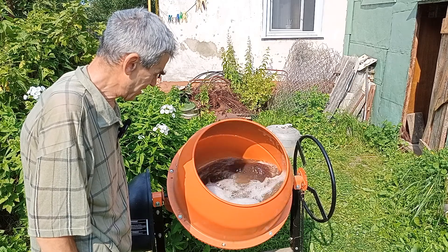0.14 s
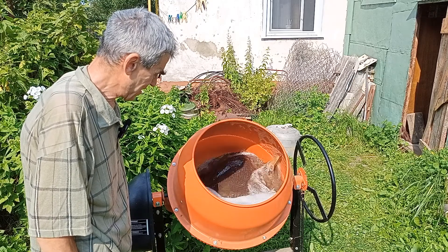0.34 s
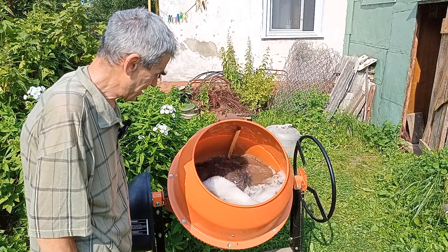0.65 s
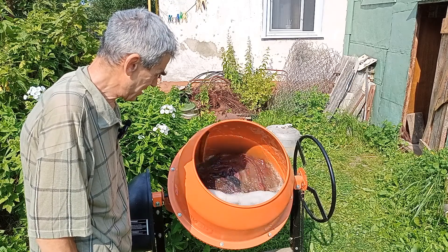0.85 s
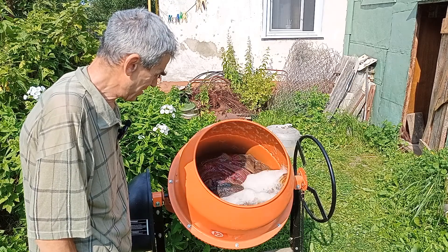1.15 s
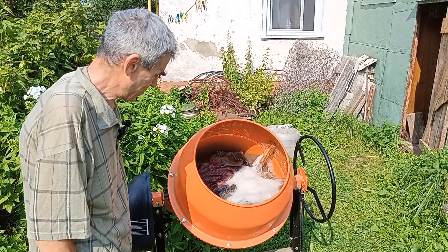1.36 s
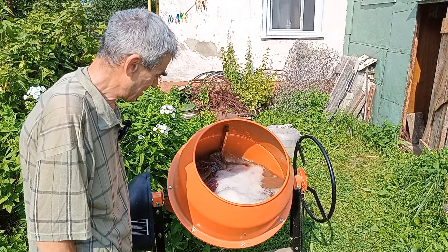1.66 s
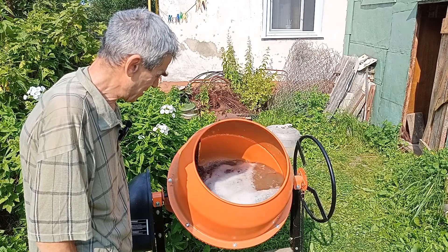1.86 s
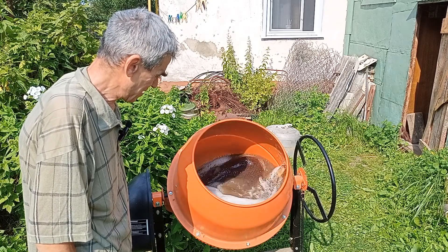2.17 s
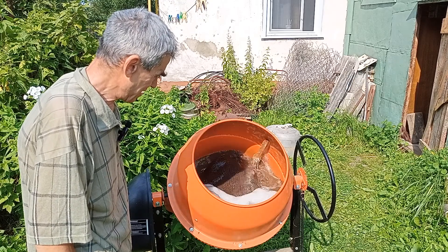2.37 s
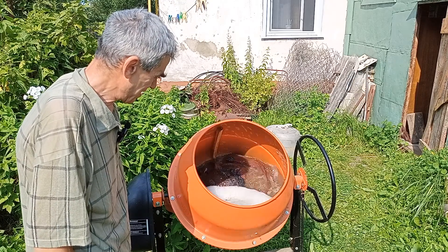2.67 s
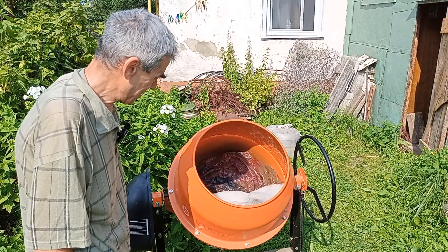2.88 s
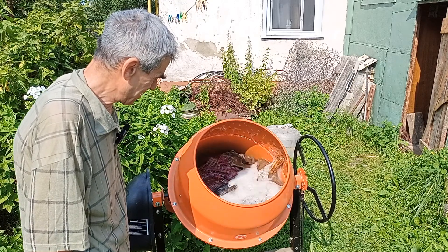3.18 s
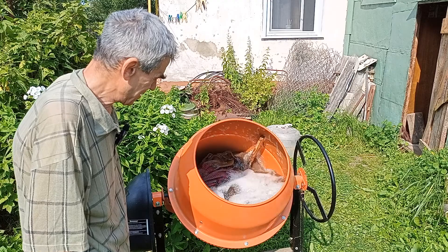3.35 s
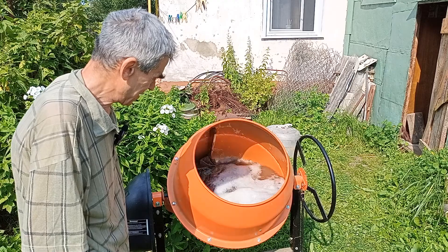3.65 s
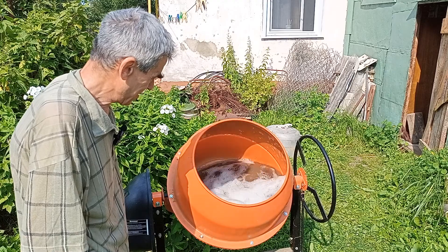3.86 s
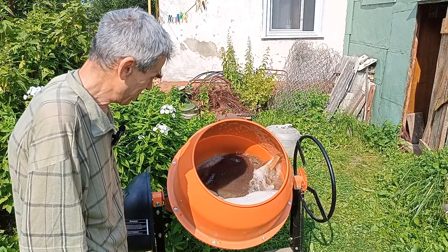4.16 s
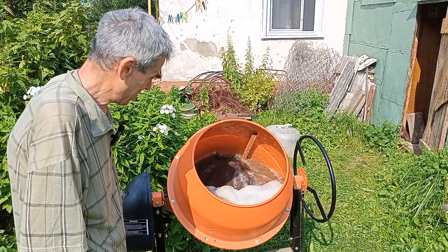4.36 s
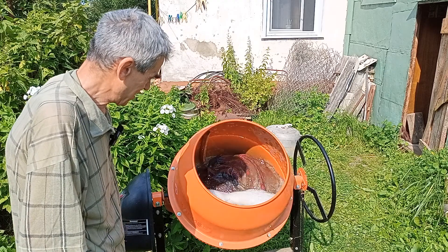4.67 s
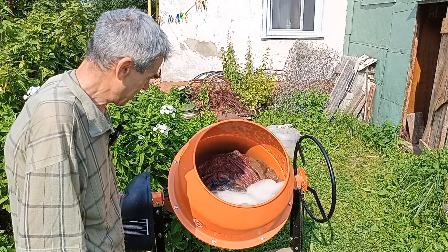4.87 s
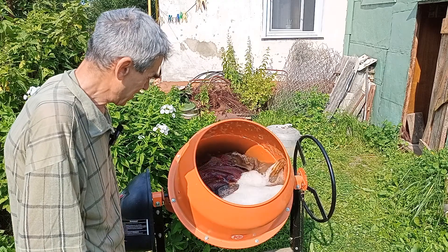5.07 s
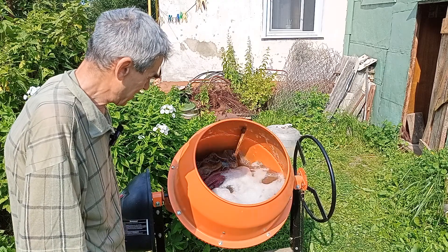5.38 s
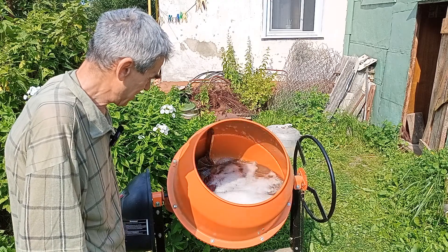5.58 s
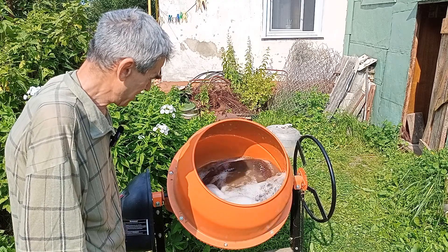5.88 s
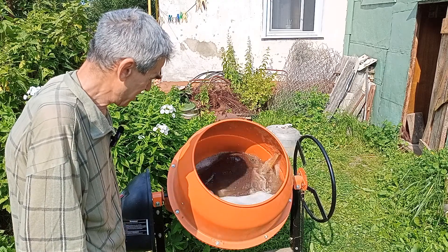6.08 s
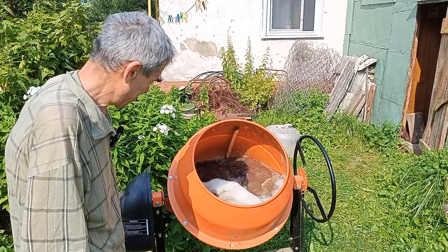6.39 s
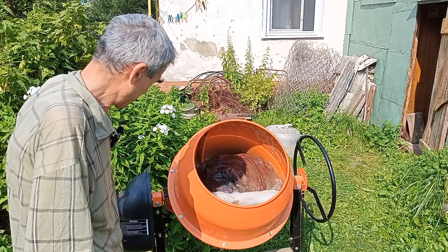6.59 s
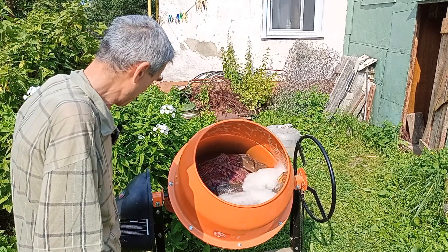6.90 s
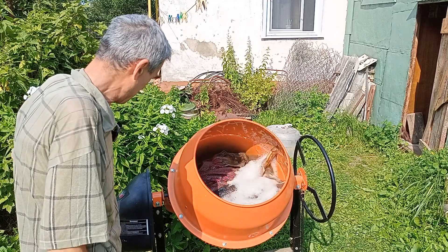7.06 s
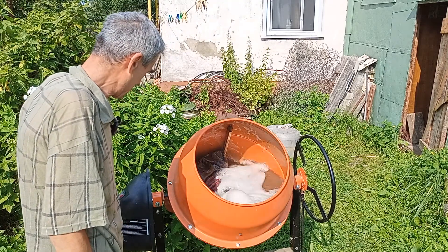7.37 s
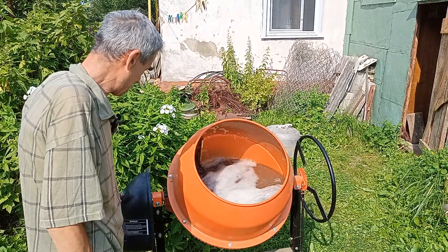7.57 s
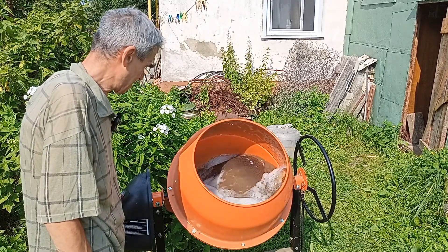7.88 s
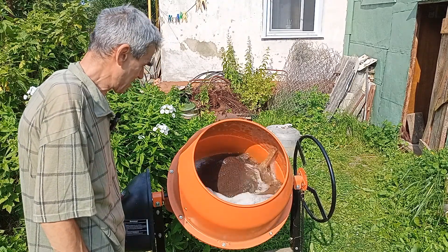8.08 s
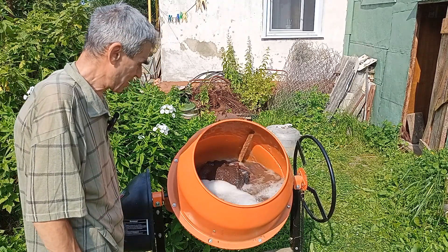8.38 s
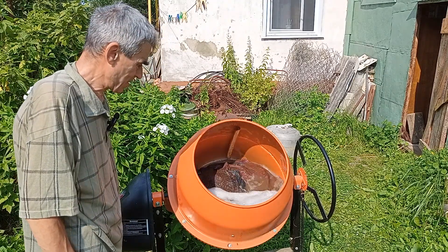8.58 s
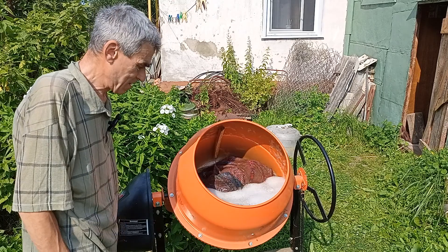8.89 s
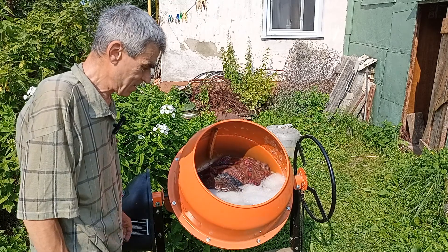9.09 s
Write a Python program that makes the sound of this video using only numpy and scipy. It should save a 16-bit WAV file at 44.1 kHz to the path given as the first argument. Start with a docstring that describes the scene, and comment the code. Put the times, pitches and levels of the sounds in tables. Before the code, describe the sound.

A toothed ring grinds round in a cycle of roughly two seconds, knocking and chattering against its pinion while the steel drum rings briefly. Beneath it, paddles heave water in surges, foam ticks, and sodden rugs drop with low gulps. Short squeals and clanks crowd together just before the machine cuts out. Then only soft, fading lapping and a few plops remain over faint open air, in narrow-band mono.

```python
"""Rattle, clanks and sloshing: an electric concrete mixer turns rugs in soapy water in a garden.
One narrow-band microphone, mono. The pinion rattles along the toothed ring, rubs at the same rough places
every 1.91 s and clanks; noise grains and damped tones make the steel drum ring.
Paddles heave the water (shaped noise and bubble tones), and rugs plunge with bursts of air-pocket tones.
Near 8 s the drive falls silent: soft lapping, a few drips, slaps and faint dull taps are left."""
import sys
import numpy as np
from scipy import signal
from scipy.fft import rfft
from scipy.io import wavfile
from scipy.ndimage import uniform_filter1d

SR = 44100
rng = np.random.default_rng(int(sys.argv[2]) if len(sys.argv) > 2 else 0)


def int16_out(signal):
    """Quantize to a 16-bit WAV file."""
    q = np.round(np.clip(np.atleast_2d(signal).T, -1, 1) * 32767)
    wavfile.write(sys.argv[1], SR, q.astype(np.int16))


N = 407474
TIME = np.arange(N) / SR

# All event levels are relative; each source sets its own reference.
# the garden air: (frequency [Hz], density [dB per Hz])
AIR_COLOUR = [(30, -24.5), (80, -30), (170, -2), (400, -7.5), (1000, -17), (2300, -22), (7100, -31),
              (8000, -34.5)]
AIR_DB = -75.5
EDGE_HZ = 7750  # upper limit of the microphone

# drive: tooth rate, time of one turn, moment it stops
TEETH_HZ, TURN_S, STOP_S = 62.8, 1.91, 7.955
BRAKE_DB_PER_S, SETTLE_DB_PER_S = 401, 85.5  # fall of driven sound and of churning after the stop
# load on the gear, scaling its rubbing: (time [s], level [dB])
LOAD = [(0, 3.5), (.45, -0.5), (.9, -6), (1.25, 5), (2.5, 0.5), (2.85, -13), (3.15, 5), (3.55, -6),
        (3.8, 1), (4.3, -3), (4.7, -9.5), (5.05, 4), (5.65, 3), (6.25, -1), (7.0, 1.5), (7.45, 5),
        (7.95, 3)]
LOAD_STIRS = 0.57  # share of the load's dB that reaches the water

# lapping that is left: (frequency [Hz], density [dB per Hz])
LAP_COLOUR = [(90, -28), (170, -4), (560, -0.5), (1500, -14.5), (7000, -34)]
LAP_DB, LAP_DB_PER_S, LAP_SWAY_DB = -66.5, 12.5, 3  # level, its fall after the stop, its unevenness
# drips and plops in the settling water: (time [s], level [dB], pitch [Hz])
DRIPS = [(8.039, -48.5, 750), (8.389, -53.5, 1030), (8.409, -59, 814), (8.522, -65.5, 1320),
         (8.626, -65, 1020), (8.7, -66, 1610), (9.0, -69, 2220), (9.143, -69, 1670)]
DRIP_DECAY_S = 0.0072
# spray thrown off the paddles: (time of the height [s], level [dB], Gaussian width [s])
SPRAYS = [(1.28, -60, 0.033), (2.523, -52, 0.0097), (4.448, -55.5, 0.022), (5.4, -67, 0.016),
          (6.83, -59.5, 0.024), (7.02, -55, 0.016), (7.307, -31, 0.0043), (7.53, -52.5, 0.015),
          (7.873, -62.5, 0.047)]
# fizz of the spray: (frequency [Hz], gain [dB])
SPRAY_COLOUR = [(3000, -19.5), (3800, -0.5), (4700, -1.0), (5800, -10.0), (6800, 4.5), (7600, -10.5)]
# small wet slaps: (time [s], level [dB])
SLAPS = [(0.87, -36.5), (0.9796, -37), (1.075, -35), (1.21, -26), (2.345, -31), (1.5551, -26),
         (2.782, -46.5), (2.976, -35.5), (2.985, -35), (3.385, -34), (3.613, -28), (4.0238, -42),
         (4.3935, -34.5), (6.598, -52), (4.5294, -37.5), (4.8742, -36), (6.44, -36.5), (6.7109, -41),
         (7.9963, -43.5), (8.3857, -61), (8.514, -63), (8.624, -62), (8.699, -63.5)]
# spatter of a slap: (frequency [Hz], gain [dB])
SLAP_COLOUR = [(100, -14.0), (400, 1.0), (1500, 5), (3200, 0.5), (5500, -21.0), (7500, -23)]

# water heaved by paddles and rugs in every turn: (time into the turn [s], length [s], level [dB])
SURGES = [(.03, 0.055, -52.5), (.12, 0.075, -58.5), (.26, 0.13, -54), (.39, 0.019, -54), (.615, 0.12, -51),
          (.73, 0.17, -51.5), (.84, 0.059, -45.5), (1.06, 0.066, -45), (1.2, 0.1, -50),
          (1.41, 0.0054, -49.5), (1.73, 0.15, -52.5)]
SURGE_ATTACK_S, SURGE_RELEASE_S = 0.012, 0.036
CHURN_DB, SHAKE_DB = -56.5, -12  # churning between surges; how much a rubbing gear shakes the water
# moving water: (frequency [Hz], density [dB per Hz])
WATER_COLOUR = [(25, -30), (95, -21), (125, -10), (165, -3.5), (230, -0.5), (420, -1.5), (600, 3),
                (720, -13.5), (950, -0.5), (1250, -19.5), (3000, -21.5), (5500, -40), (7500, -40)]
# foam ticks: (frequency [Hz], gain [dB])
FOAM_COLOUR = [(900, 6.5), (3000, -1.5), (5500, -15.0), (7400, -7.5)]
# air modes of the drum: (frequency [Hz], width [Hz], gain [dB])
HOLLOW = [(181, 17, -12.5), (283, 51, 1), (400, 29, 2.5), (420, 11, -13.5)]

# rugs dropping into the water, and after the stop a few faint dull taps:
# (time of the height [s], level [dB], pitch [Hz], Gaussian width [s])
PLUNGES_AND_TAPS = [(0.285, -49.5, 427, 0.043), (0.648, -47.5, 333, 0.019), (0.889, -41, 401, 0.027),
                    (1.08, -44.5, 417, 0.028), (1.272, -41, 307, 0.024), (1.58, -50, 205, 0.019),
                    (2.55, -51.5, 370, 0.022), (2.785, -51, 444, 0.046), (2.998, -41, 205, 0.016),
                    (3.003, -38.5, 407, 0.024), (3.186, -48, 216, 0.016), (3.89, -49, 308, 0.03),
                    (4.27, -53, 300, 0.021), (4.461, -48.5, 320, 0.041), (4.697, -45.5, 413, 0.034),
                    (4.91, -48, 210, 0.0095), (5.103, -38, 210, 0.0072), (6.605, -38, 404, 0.023),
                    (6.829, -42.5, 344, 0.03), (7.026, -45, 200, 0.027), (7.924, -53.5, 287.5, 0.059),
                    (8.635, -62.5, 530, 0.0048), (8.9, -67, 301, 0.0077), (9.007, -65.5, 221.5, 0.0068)]
BOOM_DB, BOOM_HZ, BOOM_LAG_S = -12, 181.4, 0.0154  # the air in the drum booms under each of them
POCKETS_PER_S, POCKET_CYCLES, POCKET_OCTAVES = 300, 1.63, 0.29  # rate, Gaussian decay, pitch spread either way
POCKET_OCTAVES_PER_S = -3  # they grow larger and lower as a rug sinks
OVERTONE, OVERTONE_DB = 1.83, -12  # smaller pockets gurgle higher

# steel drum modes: (frequency [Hz], resonance gain [dB], 60 dB decay [s])
DRUM = [(603, -2, .3), (775, -5, .1), (900, -2, .07), (1030, -3, .15), (1315, -1, .12), (1560, -5, .06),
        (1766, -6, .1), (1885, -2, .05), (2442, -2, .1), (2580, -3, .08), (2670, -3, .08), (2850, -1, .11),
        (3042, -3, .07), (3289, -1, .12), (3660, -4, .06), (3920, -5, .07), (4670, -1, .07),
        (5040, -1, .11), (5560, -2, .07), (5945, -4, .07), (6870, -2, .05)]
# tooth contact: (frequency [Hz], density [dB per Hz])
TOOTH_COLOUR = [(150, -30), (700, -1), (1400, 0.5), (2000, -2.5), (2320, 0.5), (2620, -4), (3150, 0.5),
                (3500, -10), (4400, -11.5), (4680, -12), (5300, -28), (5900, -27.5), (6900, -24),
                (7600, -32)]
# rough places on the toothed ring: (time into the turn [s], length [s], level [dB])
RUBS = [(.02, 0.015, -42.5), (.11, 0.0044, -51), (.2, 0.15, -56.5), (.262, .07, -64), (.39, 0.042, -56.5),
        (.535, 0.05, -57.5), (.59, 0.021, -45), (.712, 0.0069, -50), (.865, 0.014, -52.5),
        (.98, 0.045, -55), (1.062, 0.08, -55), (1.19, 0.062, -52), (1.42, 0.024, -58), (1.557, 0.18, -49.5),
        (1.7, 0.018, -57.5), (1.762, 0.067, -45.5), (1.84, 0.089, -54)]
RUB_ATTACK_S, RUB_RELEASE_S, SMOOTH_DB = 0.0046, 0.061, -61.5  # SMOOTH_DB: rattle between the rough places
# places where the teeth grate: (time into the turn [s], length [s], level [dB])
GRATES = [(.2, 0.11, -58), (1.06, .04, -60.5)]
# a tooth sticks and slips: (time of the height [s], level [dB], pitch [Hz], Gaussian width [s])
SQUEALS = [(.042, -61, 4430, 0.0027), (0.213, -64, 4050, 0.012), (0.639, -56, 3070, 0.012),
           (0.69, -53.5, 1670, 0.036), (5.012, -49.5, 3040, 0.0084), (5.963, -53.5, 3730, 0.013),
           (1.796, -38.5, 2630, 0.0056), (2.228, -51, 3990, 0.0022), (3.111, -40.5, 3930, 0.0024),
           (3.75, -46.5, 3106, 0.021), (3.895, -43, 4630, 0.0054), (4.046, -56, 3710, 0.019),
           (5.235, -53, 5540, 0.003), (5.394, -56, 5570, 0.0033), (5.398, -55, 6830, 0.0037),
           (5.545, -41.5, 2247, 0.0055), (5.592, -43, 2634, 0.013), (5.613, -44, 1630, 0.018),
           (5.639, -43.5, 1378, 0.019), (6.354, -40.5, 3754, .006), (6.937, -53, 2380, 0.012),
           (7.145, -58, 5550, 0.0068), (7.15, -54.5, 6880, 0.0039), (7.22, -52, 3330, 0.0067),
           (7.307, -38, 4970, .004), (7.524, -43, 4076, 0.0035), (7.56, -44.5, 2670, 0.042),
           (7.59, -41.5, 1348, 0.017), (7.618, -43, 1036, 0.012), (7.623, -51, 6700, 0.0037),
           (7.67, -31.5, 4720, 0.002), (7.705, -33, 4670, 0.002), (7.72, -46, 2506, 0.031),
           (7.797, -52, 4620, .004), (7.81, -50.5, 2443, 0.018), (7.862, -45.5, 3930, 0.003)]
SQUEAL_WAVER, SQUEAL_SAG_PER_S = 0.005, 0.28  # relative unsteadiness and fall of pitch

# gear knocks and clanks: (time [s], level [dB], strongest ring [Hz], treble level [dB], teeth in a row)
KNOCKS = [(0.013, -44, 3270, -9, 1), (0.026, -29.5, 3290, -8.5, 1), (0.038, -26, 1850, -14.5, 1),
          (0.04, -22.5, 2733, -15, 1), (0.062, -26, 2592, -19, 1), (0.073, -39, 2490, -20, 1),
          (0.199, -42.5, 3070, -9, 1), (0.234, -43, 3170, -7, 1), (0.313, -43, 2090, -10, 1),
          (0.425, -44.5, 2970, -16, 2), (0.588, -50.5, 4900, -7, 2), (0.617, -27.5, 2578, -10, 1),
          (0.632, -37.5, 2970, -9, 2), (1.198, -30.5, 3516, -16, 1), (1.222, -39, 2460, -28, 1),
          (1.24, -35, 2736, -28, 3), (1.452, -47.5, 3330, -6.5, 3), (1.571, -34.5, 2670, 8, 1),
          (1.598, -36.5, 2580, -28, 1), (1.633, -40, 2460, -16, 2), (1.696, -36.5, 2520, -26, 1),
          (1.714, -32, 2200, -26, 1), (1.762, -30, 3070, -2.5, 1), (1.778, -34, 1520, -10, 2),
          (1.936, -42, 2690, -4, 1), (1.948, -20.5, 1944, -16, 1), (1.955, -32, 2960, -22, 1),
          (1.972, -30, 1800, -23, 1), (1.984, -34.5, 2560, -13, 1), (2.127, -44.5, 3100, -11, 2),
          (2.225, -45.5, 3800, -5, 1), (2.307, -46, 3750, -13, 1), (2.336, -38, 3160, -9.5, 2),
          (2.37, -47, 1580, -22, 2), (2.499, -42.5, 3050, -26, 1), (2.514, -40.5, 2590, -10, 1),
          (2.53, -34.5, 2814, -7.5, 1), (2.621, -50, 2360, -30, 1), (2.637, -46.5, 1685, -35, 2),
          (3.066, -47, 1620, -20, 1), (3.094, -39, 1580, -22, 1), (3.222, -46, 2880, -14, 1),
          (3.11, -35.5, 3550, -16.5, 1), (3.129, -38.5, 2230, -28, 1), (3.495, -47.5, 3070, -9, 2),
          (3.618, -31.5, 2640, -29, 1), (3.629, -32.5, 2170, -36, 1), (3.676, -34.5, 2900, -13.5, 2),
          (3.706, -34, 2570, -17.5, 4), (3.861, -23, 1964, -16.5, 1), (3.885, -29.5, 1980, -13, 1),
          (3.895, -36.5, 2870, -9, 1), (3.913, -37, 2510, -13, 1), (4.086, -47, 3620, -7, 1),
          (4.409, -35.5, 2700, -9, 2), (4.425, -47, 2970, -14, 1), (4.438, -33.5, 2610, -6, 1),
          (5.099, -37, 2516, -5.5, 3), (5.247, -37.5, 2760, -6, 1), (5.267, -37.5, 2040, -8, 1),
          (5.286, -35.5, 3366, -15, 1), (5.377, -43, 1484, -20, 1), (5.528, -37, 2540, -16, 2),
          (5.586, -40, 2700, -23, 3), (5.759, -26.5, 2124, 0.5, 1), (5.772, -23, 1850, -10, 1),
          (5.779, -27, 2930, -18, 1), (5.793, -36.5, 1930, -19, 1), (5.804, -31, 2510, -17, 1),
          (6.335, -38, 2520, 0.5, 1), (6.35, -31, 2532, -3, 1), (6.381, -36.5, 3170, -9, 1),
          (6.036, -44.5, 2920, -13, 2), (6.929, -43.5, 1546, -5, 1), (6.995, -41, 2750, -9, 2),
          (7.044, -42.5, 2910, -10, 1), (7.197, -42.5, 3250, -6.5, 2), (7.303, -32, 878, 2, 1),
          (7.316, -29, 3170, -8, 1), (7.436, -52, 2730, -6, 2), (7.495, -29, 3274, 5.5, 1),
          (7.506, -34, 1480, -14, 3), (7.554, -39, 1380, -21.5, 2), (7.604, -39.5, 2130, -13, 1),
          (7.677, -31.5, 1453, -13, 1), (7.683, -27, 1680, -13, 1), (7.703, -34.5, 1884, -7.5, 2),
          (7.793, -51, 4670, 10, 2), (7.901, -47, 4300, -16, 3)]
CHATTER_DB, CHATTER_OCTAVES = -2.5, .4  # change per further tooth; largest pitch shift either way
# knock scrape: (frequency [Hz], density [dB per Hz])
KNOCK_COLOUR = [(60, -35), (200, -9.5), (400, -4), (700, -17), (1200, -6), (1900, -1), (2250, -4),
                (2650, 1), (3300, -2.5), (3800, -8), (4700, -13.5), (5800, -26.5), (6900, -20),
                (7600, -30.5)]
SPLATTER_DB, SPLATTER_S = -20.5, 0.029  # wet rattle that follows a blow


def amp(db):
    """Turns dB into an amplitude factor."""
    return 10 ** (np.asarray(db) / 20)


def unit(x):
    """Scales to rms 1."""
    return x / np.sqrt(np.mean(x ** 2) + 1e-20)


def add(mix, s, sound):
    """Mixes a sound in at time s."""
    part = mix[max(round(s * SR), 0):][:len(sound)]
    part += sound[:len(part)]


def colour(x, points, size=4096):
    """Causal filter with the given spectrum, so that attacks stay sharp."""
    hz, db = np.transpose(points)
    bin_hz = abs(np.fft.fftfreq(size, 1 / SR))
    log_gain = np.log(amp(np.interp(np.log(bin_hz + 1), np.log(hz), db)))
    # minimum phase, from the Hilbert transform of the log gain
    taps = np.fft.ifft(np.exp(np.conj(signal.hilbert(log_gain)))).real[:size // 2]
    return signal.fftconvolve(x, taps)[:len(x)]


def band(x, lo_hz, hi_hz, order=2):
    """Band-pass."""
    edges = [lo_hz, min(hi_hz, SR / 2 - 1)]
    return signal.sosfilt(signal.butter(order, edges, "bandpass", fs=SR, output="sos"), x)


def steadied(x, span_s):
    """Holds the short-time rms near 1, keeping the finer grain."""
    power = uniform_filter1d(x ** 2, max(int(span_s * SR), 2))
    return x / np.sqrt(abs(power) + np.mean(x ** 2) / 100)


def scatter(x, t60, wet_db):
    """Adds dense echoes that fall by 60 dB within t60."""
    t = np.arange(SR // 2) / SR
    fade = np.exp(-np.log(1000) * t / t60) * (1 - np.exp(-t / 0.0055))
    tail = rng.standard_normal(len(t)) * fade
    return x + amp(wet_db) * signal.fftconvolve(x, tail / np.linalg.norm(tail))[:N]


def drum(x, ring_db):
    """Adds the decaying modes of the steel shell to whatever shakes it."""
    t = np.arange(SR // 2) / SR
    ring = np.zeros(len(t))
    for hz, db, t60 in DRUM:
        # division by the decay time makes the gain that of the resonance peak
        ring += amp(db) / t60 * np.exp(-np.log(1000) * t / t60) * np.cos(2 * np.pi * hz * t)
    return x + amp(ring_db) * signal.fftconvolve(x, ring / abs(rfft(ring)).max())[:N]


def roam(x, depth_db, width_hz, hold_s):
    """The shell turns and water damps it here and there, so its resonances come and go."""
    z = signal.stft(x, nperseg=512, noverlap=384)[2]
    field = rng.standard_normal((len(z), 3300))
    for _ in range(2):
        field = uniform_filter1d(field, max(round(width_hz * 512 / SR), 1), axis=0)
        field = uniform_filter1d(field, max(round(hold_s * SR / 128), 1), axis=1)
    gain = unit(amp(depth_db * np.clip(unit(field), -2, 2)))
    return signal.istft(z * gain[:, :z.shape[1]], nperseg=512, noverlap=384)[1][:N]


def each_turn(places, attack_s, release_s):
    """Gain over time: each place swells, holds and dies away once in every turn of the drum."""
    power = np.zeros(N)
    for s, length_s, db in places:
        age = (TIME - s) % TURN_S
        attack = np.minimum(age / attack_s, 1)
        release = np.exp(-np.maximum(age - length_s, 0) / release_s)
        power += (amp(db) * attack * release) ** 2
    return np.sqrt(power)


def after_stop(db_per_s):
    """Gain that is 1 while the drive runs and then falls steadily in dB."""
    return amp(-db_per_s * np.maximum(TIME - STOP_S, 0))


def bubbles(per_s, lo_hz, hi_hz, cycles, rise, spread_db, count=36):
    """A swarm of bubbles, each a dying tone; a positive rise lifts its pitch as it nears the surface."""
    out, t = np.zeros(N), np.arange(4000) / SR
    for hz in np.geomspace(lo_hz, hi_hz, count):
        age = t * hz / cycles
        sine = np.sin(2 * np.pi * hz * t * (1 + rise * np.minimum(age, 4)))
        tone = unit(sine * np.exp(-age) * (1 - np.exp(-8 * age)))
        births = rng.random((400, 2))[:int(per_s * TIME[-1] / count)]
        sizes = amp(spread_db * np.minimum(-np.log(births[:, 1] + 1e-9), 3))
        for s, gain in zip((births[:, 0] * TIME[-1]).tolist(), sizes):
            add(out, s, tone * gain)
    return out


def garden_air():
    """Steady coloured noise stands for the air of the place."""
    return amp(AIR_DB) * unit(colour(rng.standard_normal(N), AIR_COLOUR))


def motor():
    """A faint whine wavers around 603 Hz while the drive runs."""
    waver = unit(band(rng.standard_normal(N), 2, 25))
    running = np.clip((STOP_S - TIME) / .05, 0, 1)
    return amp(-67) * running * np.sin(2 * np.pi * np.cumsum(603 + 7 * waver) / SR)


def lapping():
    """Water laps as an uneven wash with a patter of drops, and fades after the drive stops."""
    sway = unit(band(rng.standard_normal(N), 15.0, 16))
    level = amp(LAP_DB + LAP_SWAY_DB * sway) * after_stop(LAP_DB_PER_S)
    patter = unit(bubbles(45, 450, 3800, cycles=3, rise=0, spread_db=4))
    wash = unit(colour(rng.standard_normal(N), LAP_COLOUR)) + .4 * patter
    return level * wash


def drips():
    """Each drop ticks and leaves a short, slightly rising bubble tone."""
    out, t = np.zeros(N), np.arange(SR // 10) / SR
    for s, db, hz in DRIPS:
        tick = unit(band(rng.standard_normal(len(t)), hz * 0.43, hz * 1.6))
        tone = np.sin(2 * np.pi * hz * (t + 0.9 * t ** 2))
        shape = np.exp(-t / DRIP_DECAY_S) * (1 - np.exp(-t / 0.0008))
        add(out, s, amp(db) * (tone + .5 * tick) * shape)
    return scatter(out, t60=.12, wet_db=-5.5)


def spray():
    """Sheets of water break into a dense fizz of tiny bubbles."""
    tiny = unit(bubbles(1200, 3800, 7300, cycles=24, rise=0, spread_db=4))
    fizz = steadied(colour(tiny + .5 * rng.standard_normal(N), SPRAY_COLOUR), 0.019)
    return fizz * sum(amp(db) * np.exp(-((TIME - s) / width_s) ** 2 / 2) for s, db, width_s in SPRAYS)


def slaps():
    """Water slaps the wall and breaks into a short spatter."""
    out, t = np.zeros(N), np.arange(6000) / SR
    shape = np.exp(-t / 0.043) * (1 - np.exp(-t / 0.0012))
    for s, db in SLAPS:
        spatter = rng.standard_normal(len(t)) * amp(2.0 * rng.standard_normal(len(t)))
        add(out, s, amp(db - 14.0) * unit(colour(spatter, SLAP_COLOUR)) * shape)
    return out


def churning(rubbing, load):
    """Large bubbles gurgle over a wash inside the hollow drum; small ones tick in the foam."""
    gurgle = unit(bubbles(200, 150, 1200, cycles=7, rise=.03, spread_db=4)) * after_stop(BRAKE_DB_PER_S)
    body = colour(gurgle + amp(1) * rng.standard_normal(N), WATER_COLOUR)
    hollow = body.copy()
    for hz, width, db in HOLLOW:
        hollow += amp(db) * band(body, hz - width / 2, hz + width / 2, order=1)
    rumble = unit(band(rng.standard_normal(N), 25, 120))
    pops = bubbles(450, 1200, 7400, cycles=5, rise=0, spread_db=4.5)
    fizzing = scatter(unit(colour(pops, FOAM_COLOUR)), t60=.2, wet_db=-5)
    surges = each_turn(SURGES, SURGE_ATTACK_S, SURGE_RELEASE_S)
    driven = np.hypot(surges, amp(SHAKE_DB) * rubbing) * after_stop(BRAKE_DB_PER_S)
    settling = amp(CHURN_DB) * after_stop(SETTLE_DB_PER_S)
    level = np.hypot(driven, settling) * load ** LOAD_STIRS
    return level * (amp(-2.5) * steadied(hollow, 0.023) + amp(-41) * rumble + amp(-15.5) * fizzing)


def pockets(t, hz):
    """A burst of air pockets around one pitch, each only a few cycles long."""
    when, size, phase = rng.random((3, int(POCKETS_PER_S * np.ptp(t)), 1))
    birth = t[0] + when * np.ptp(t)
    pitch = hz * 2 ** (POCKET_OCTAVES * (size * 2 - 1) + POCKET_OCTAVES_PER_S * birth)
    cycles = (t - birth) * pitch
    fade = np.exp(-np.minimum((cycles / POCKET_CYCLES) ** 2, 20))
    return unit((fade * np.sin(2 * np.pi * (cycles + phase))).sum(0))


def plunges_and_taps():
    """A falling rug squeezes out air pockets, a broken gulp with a late boom; brief bursts make the taps."""
    out, t = np.zeros(N), np.arange(-SR // 8, SR // 8) / SR
    for s, db, hz, width_s in PLUNGES_AND_TAPS:
        noise = rng.standard_normal(len(t))
        burst = pockets(t, hz) + amp(OVERTONE_DB) * pockets(t, hz * OVERTONE)
        burst += amp(-7.0) * unit(colour(noise, WATER_COLOUR))
        boom = steadied(band(noise, BOOM_HZ * 0.92, BOOM_HZ * 1.25), 0.018)
        swell = np.exp(-(t / width_s / np.where(t < 0, .8, 1)) ** 2 / 2)  # rises faster than it falls
        add(out, s + t[0], amp(db - 1.5) * steadied(burst, 0.015) * swell)
        add(out, s + t[0] + BOOM_LAG_S, amp(db + BOOM_DB) * boom * swell)
    return scatter(out, t60=0.041, wet_db=-2)


def grating():
    """Twice in a turn the teeth run dry and grate: crisp ticks high in the steel."""
    ticks = rng.standard_normal(N) * (rng.random(N) < 1100 / SR)
    ticks *= 1 + np.cos(2 * np.pi * TEETH_HZ * TIME) / 2
    crackle = steadied(band(drum(ticks, ring_db=-3), 2850, 4700, order=3), .05)
    return crackle * each_turn(GRATES, RUB_ATTACK_S, SURGE_RELEASE_S) * after_stop(BRAKE_DB_PER_S)


def squeals():
    """Stick and slip holds one resonance of the shell for a moment."""
    out, t = np.zeros(N), np.arange(-SR // 8, SR // 8) / SR
    for s, db, hz, width_s in SQUEALS:
        waver, flutter = (unit(band(noise, 15, 110)) for noise in rng.standard_normal((2, len(t))))
        pitch = hz * (1 - SQUEAL_SAG_PER_S * t + SQUEAL_WAVER * waver)
        tone = np.sin(2 * np.pi * np.cumsum(pitch) / SR) * amp(2.2 * flutter)
        add(out, s + t[0], amp(db) * unit(tone) * np.exp(-(t / width_s) ** 2 / 2))
    return scatter(out, t60=.09, wet_db=-10.0)


def gear(rubbing, load):
    """Each tooth grinds the pinion unevenly and scrapes until the next; the mesh is cleanest once a turn."""
    turn_wave = np.cos(2 * np.pi * (TIME - .5) / TURN_S)
    teeth = TEETH_HZ * TIME + .42 - .08 * turn_wave  # running count of teeth
    force = amp(rng.uniform(-3.5, 3.5, 1000))[teeth.astype(int)]
    clean = .62 + .3 * turn_wave
    age = (teeth % 1) / .2
    contact = .27 + 3 * clean * force * age * np.exp(-age) * (TIME < STOP_S)
    grit = rng.choice([-1, 1], N) * (rng.random(N) < 2600 / SR)
    shake = colour(contact * grit, TOOTH_COLOUR)
    shell = roam(drum(shake, ring_db=1), depth_db=5.5, width_hz=300, hold_s=.06)
    level = load * np.hypot(rubbing, amp(SMOOTH_DB)) * after_stop(BRAKE_DB_PER_S)
    echoing = scatter(shell, t60=.08, wet_db=-9)
    return amp(-0.5) * level * steadied(echoing, 0.036)


def blows():
    """Lists (s, dB, Hz, treble dB): knocks chatter on over the next teeth, each ringing higher or lower."""
    detune = rng.uniform(-1, 1, (len(KNOCKS), 6)) * CHATTER_OCTAVES
    struck = []
    for (s, db, hz, treble_db, teeth), shift in zip(KNOCKS, detune):
        for k in range(round(teeth)):
            pitch = hz * 2 ** (shift[k] * (k > 0))  # the first tooth keeps its pitch
            struck.append((s + k / TEETH_HZ, db + k * CHATTER_DB, pitch, treble_db))
    return struck


def splatter():
    """Hard blows shake the wet drum into a dying patter of tiny impacts."""
    power = np.zeros(N)
    for s, db, _, _ in blows():
        if db > -34:
            power += (TIME > s) * amp(2 * db) * np.exp(-2 * np.maximum(TIME - s, 0) / SPLATTER_S)
    ticks = rng.standard_normal(N) * (rng.random(N) < 1300 / SR)
    return amp(SPLATTER_DB) * np.sqrt(power) * steadied(colour(ticks, KNOCK_COLOUR), 0.048)


def knocks():
    """Backlash: a tooth grinds home in milliseconds and excites a new mix of quickly damped rim modes."""
    out, t = np.zeros(N), np.arange(2400) / SR
    swell = (t / .0052) ** 4 * np.exp(4 - t / .0013)  # peaks at 5.2 ms
    linger = np.exp(-t / .013) * (1 - np.exp(-t / .004))
    slots = np.linspace(150, 7500, 37)[:, None]  # lowest pitch of each rim mode, Hz
    for s, db, hz, treble_db in blows():
        pitch, phase, size = rng.random((3, len(slots), 1))
        modes = np.sin(2 * np.pi * ((slots + 200 * pitch) * t + phase))
        rim = unit((amp(-16 * size) * modes).sum(0))
        # hard blows are short and dry, light ones linger
        shape = swell + np.interp(db, [-38, -22], [.8, .2]) * linger
        grind = 0.5 * rng.standard_normal(len(t)) * swell
        scrape = colour(rim * shape + grind, KNOCK_COLOUR, size=2048)
        ring = unit(np.sin(2 * np.pi * (hz * t + rng.random())) * (shape + .13 * linger))
        ring_gain = amp(np.interp(db, [-36, -22], [-.5, 4]))  # hard blows ring more strongly
        body = unit(band(scrape, 40, 4700, order=4))
        treble = unit(band(scrape, 4430, 7200, order=3))
        blow = body + ring_gain * ring + amp(treble_db - 1.0) * treble
        add(out, s - .003, amp(db - 10.0) * unit(blow))
    return scatter(drum(out, ring_db=-10.0), t60=0.09, wet_db=-9)


def scene():
    """The rubbing of the ring drives both the rattle and the shaking of the water."""
    load = amp(np.interp(TIME, *np.transpose(LOAD)))
    rubbing = each_turn(RUBS, RUB_ATTACK_S, RUB_RELEASE_S)
    wet = lapping() + drips() + spray() + slaps() + churning(rubbing, load) + plunges_and_taps()
    machine = motor() + grating() + squeals() + gear(rubbing, load) + splatter() + knocks()
    return (garden_air() + wet + machine)[None]


def record(dry):
    """A narrow-band microphone: a steep low-pass at the edge."""
    taps = signal.firwin(401, EDGE_HZ, window=("kaiser", 8), fs=SR)
    return signal.oaconvolve(dry, taps[None], "same")


dry = scene()
out = record(dry)
int16_out(out)
```